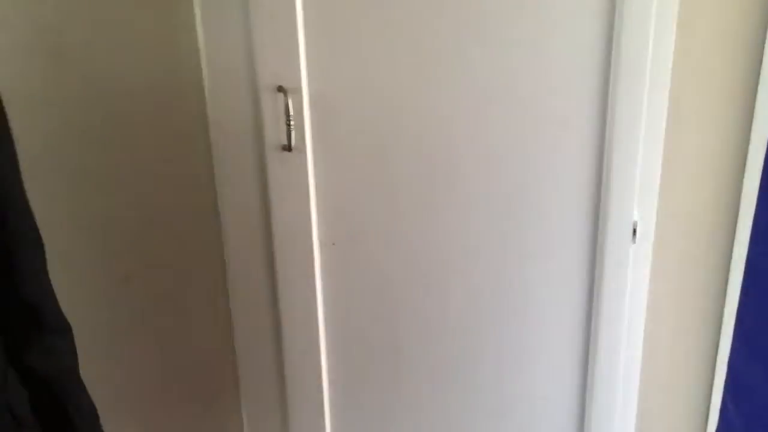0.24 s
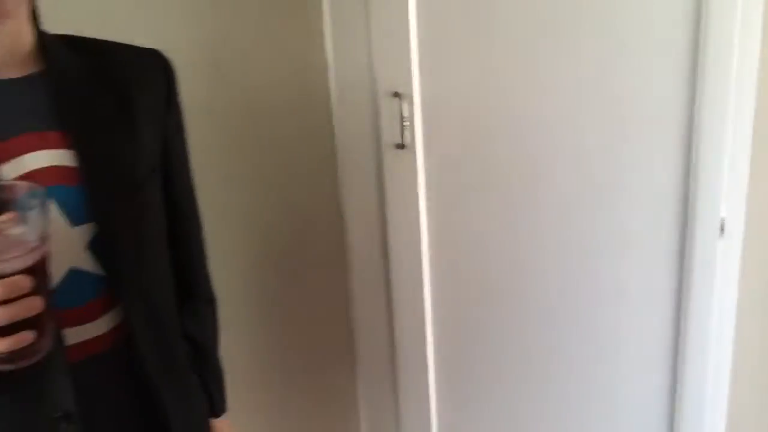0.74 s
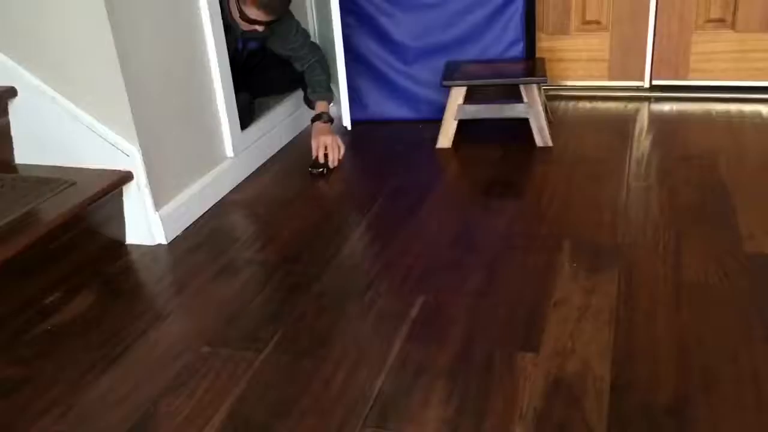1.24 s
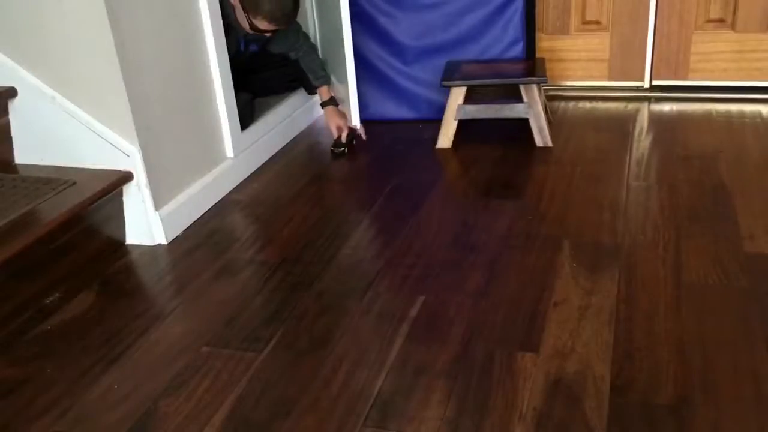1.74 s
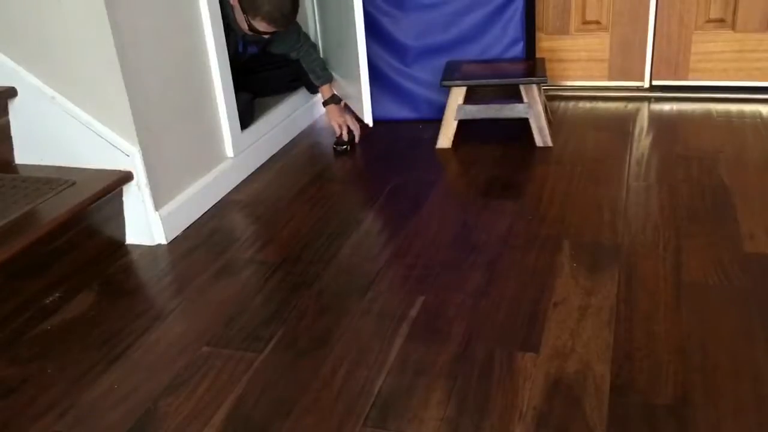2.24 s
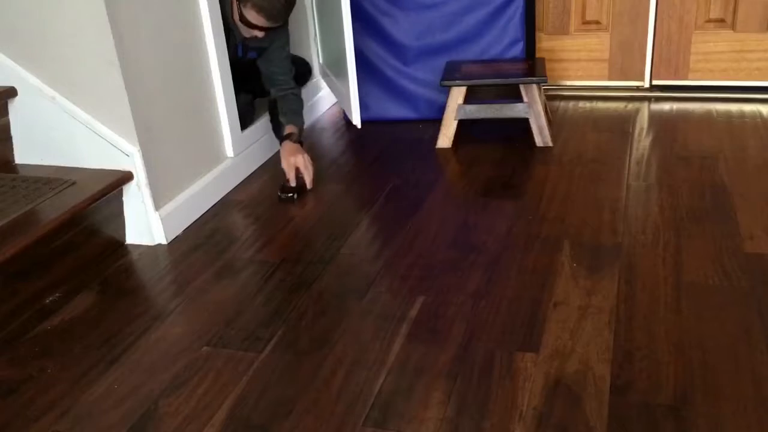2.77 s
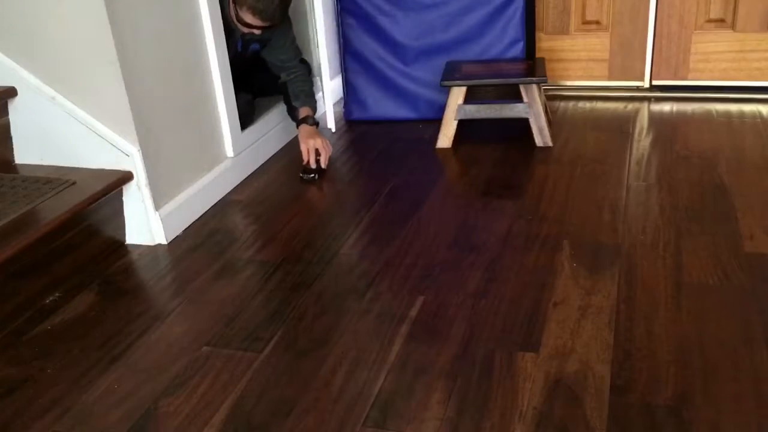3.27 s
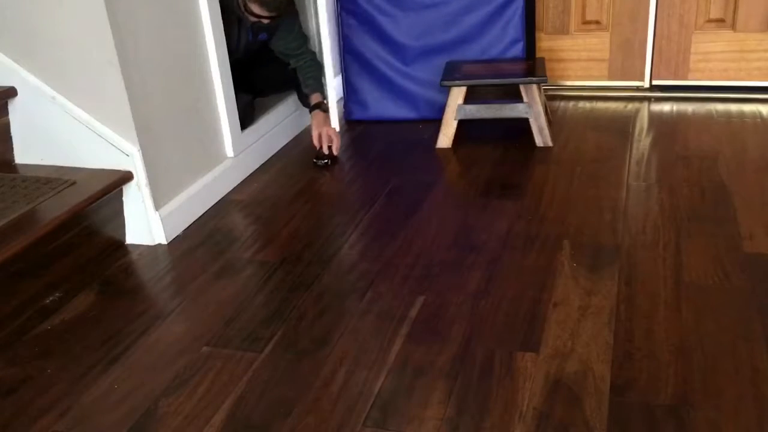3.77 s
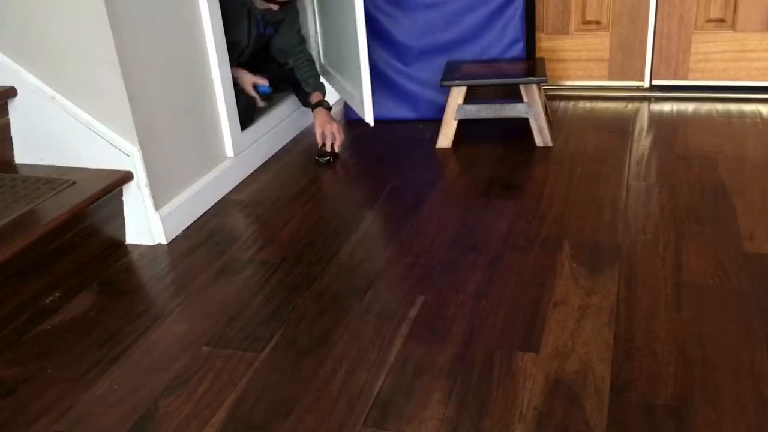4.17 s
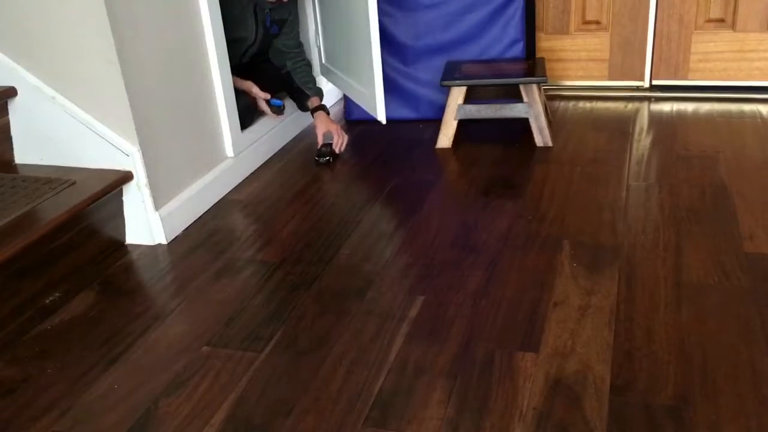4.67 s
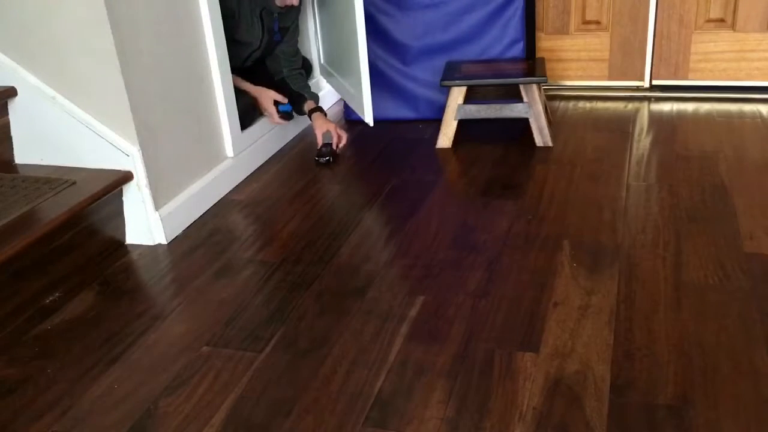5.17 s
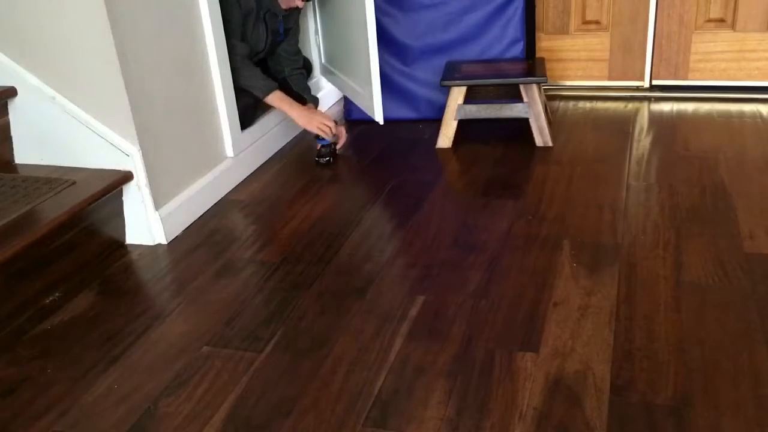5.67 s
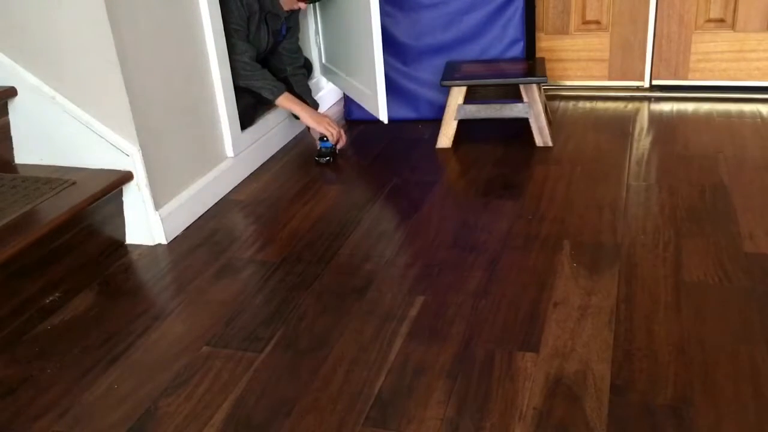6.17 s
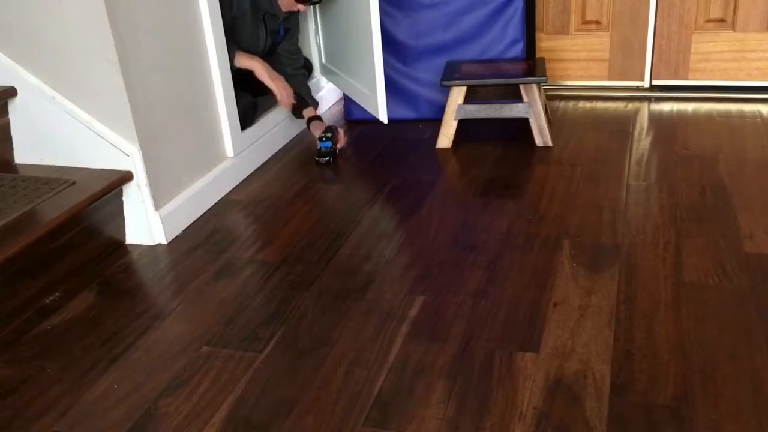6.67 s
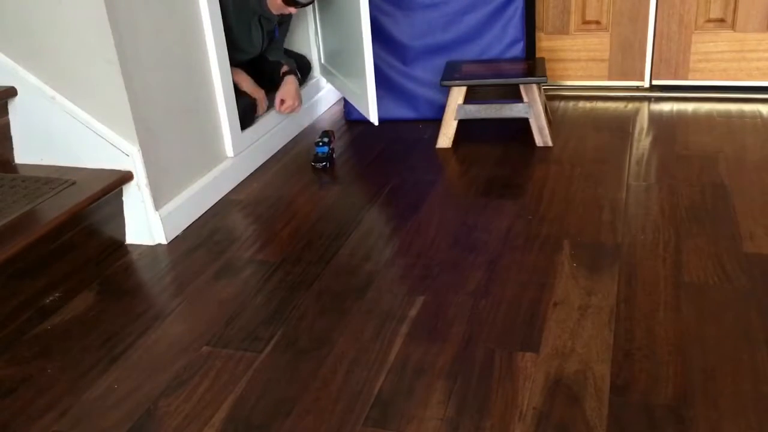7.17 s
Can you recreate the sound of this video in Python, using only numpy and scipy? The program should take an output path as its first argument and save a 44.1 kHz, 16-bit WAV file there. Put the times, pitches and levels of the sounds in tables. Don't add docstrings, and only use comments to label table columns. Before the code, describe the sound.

Indoors, in a small bare hallway with a wooden floor, over faint low house murmur and soft hiss. At about 0.15 s a door shuts with a deep, short thud and metallic latch click; soft boomy steps follow from 0.4 to 1.2 s. From 1.2 s a small toy car is handled very close: light plastic ticks, faint gear whirr while rolling, and four spaced sharp ratchet snaps between 1.7 and 2.0 s. Sparse ticks continue, then a hard wheel slap on the boards at 2.87 s. From 3.1 to 3.6 s the ratchet fires a fast, loud, bright burst of about thirteen snaps, with two more at 3.9 and 4.0 s. Soft clustered ticks come around 4.3 s, then isolated taps, a tiny flick at 5.28 s and light touches near 5.9 s. At 6.5 s a dull thump lands, followed by a close tick and low floor booms fading to the end.

```python
import sys
import numpy as np
from scipy import signal
from scipy.fft import rfft, irfft, next_fast_len
from scipy.io import wavfile

SR = 44100
rng = np.random.default_rng(int(sys.argv[2]) if len(sys.argv) > 2 else 0)


def inscribe(sig):
    pcm = np.round(np.clip(np.atleast_2d(sig).T, -1, 1) * 32767)
    wavfile.write(sys.argv[1], SR, pcm.astype(np.int16))


def amplitude_ratio(level_db):
    exponent = np.asarray(level_db, float) / 20
    return 10 ** exponent


N = 327001


def rms_one(x):
    return x / np.sqrt(np.mean(x ** 2) + 1e-20)


def drift(rate):
    r = np.exp(-2 * np.pi * rate / SR)
    walk = signal.lfilter([1], [1, -2 * r, r * r], rng.standard_normal(N + SR // 4))
    return rms_one(walk[SR // 4:])


def coloured(spectrum):
    size = next_fast_len(N)
    bins = rfft(rng.standard_normal(size))
    points_hz, points_db = np.transpose(spectrum)
    hz = np.arange(len(bins)) * SR / size
    level_db = np.interp(np.log(hz + 1), np.log(points_hz), points_db)
    return rms_one(irfft(bins * amplitude_ratio(level_db), size)[:N])


def swell(s, db, length, rise=0.79):
    out = np.zeros(N)
    near = np.arange(max(int((s - 4 * length) * SR), 0), min(int((s + 4 * length) * SR), N))
    u = (near / SR - s) / length
    out[near] = amplitude_ratio(db) * np.exp(-np.where(u < 0, u / rise, u) ** 2)
    return out


def body(x, peaks, lean_db=0):
    out = 0
    places = np.linspace(-1, 1, len(peaks))
    for k, ((hz, width, db), place) in enumerate(zip(peaks, places)):
        r = np.exp(-np.pi * width / SR)
        poles = [1, -2 * r * np.cos(2 * np.pi * hz / SR), r * r]
        ringing = signal.lfilter([1, 0, -1], poles, x + 1e-18) * (1 - r * r) / 2
        out = out + (-1) ** k * amplitude_ratio(db + place * lean_db) * ringing
    return out


def struck(at_s, peak_db, peaks, rise, fall, lean_db=0):
    t = np.arange(SR // 40) / SR
    shape = (1 - np.exp(-(t / rise) ** 2)) * np.exp(-t / fall)
    chatter = rng.standard_normal((len(at_s), len(t))) * shape
    hits = body(chatter, peaks, np.reshape(lean_db, (-1, 1)))
    out = np.zeros(N + len(t))
    for s, db, hit in zip(at_s, peak_db, hits):
        start = round(s * SR)
        out[start:start + len(t)] += amplitude_ratio(db) * hit / np.abs(hit).max()
    return out[:N]


def rung(at_s, peak_db, hz, rise, fall):
    t = np.arange(SR // 40) / SR
    out = np.zeros(N + len(t))
    shape = (1 - np.exp(-(t / rise) ** 2)) * np.exp(-t / fall)
    shape = shape / shape.max()
    for s, db, f in np.broadcast(at_s, peak_db, hz):
        start = round(s * SR)
        out[start:start + len(t)] += amplitude_ratio(db) * shape * np.sin(2 * np.pi * (f * t + rng.random()))
    return out[:N]


# (delay t/s, level/dB)
ECHOES = [
    (.0068, -11),
    (0.0103, -7.5),
    (.024, -12.5),
]


def hall(x, peaks, t60, wet_db, blur=1.9):
    out = x.copy()
    for s, db in ECHOES:
        out[round(s * SR):] += amplitude_ratio(db) * x[:-round(s * SR)]
    t = np.arange(SR * 3 // 4) / SR
    tail = rng.standard_normal(len(t)) * amplitude_ratio(-60 * t / t60) * (1 - np.exp(-t / 0.00033))
    own = signal.oaconvolve(x, tail / np.sqrt(np.sum(tail ** 2)))[:N]
    fill = np.exp(-1 / (0.00077 * SR))
    keep = amplitude_ratio(-2 * 60 / (t60 * SR))
    decay = np.convolve([1, -keep], [1, -fill])
    energy = signal.lfilter([(1 - keep) * (1 - fill)], decay, x ** 2 + 1e-18)
    wide = [(hz, blur * width, db) for hz, width, db in peaks]
    mixed = np.sqrt(np.abs(energy)) * rms_one(body(rng.standard_normal(N), wide))
    share = 0.45
    return out + amplitude_ratio(wet_db) * (np.sqrt(share) * own + np.sqrt(1 - share) * mixed)


# (t/s, level/dB)
STIRRING = [(0.0, -70), (0.2, -67.5), (0.37, -62.5), (0.6, -58.5), (0.9, -58.5), (1.05, -66), (2.04, -65),
            (2.64, -68.5), (3.51, -62), (4.6, -70), (5.34, -68.5), (6.48, -69.5), (6.73, -65.5),
            (7.41, -64)]
# (peak t/s, level/dB, length/s)
SCUFFS = [
    (0.174, -36.5, 0.048),
    (0.257, -51, 0.038),
    (2.904, -50.5, 0.068),
    (3.8, -45.5, 0.048),
    (6.858, -48, 0.019),
]
# (f/Hz, density/dB per Hz)
MURMUR = [(47, -57), (80, -10.5), (129, -7), (145, -13.5), (167, -13), (216, -12), (252, -26), (320, -26),
          (420, -56), (700, -120)]
RUSH = [(150, -36.5), (250, -1.5), (300, -5), (360, -8), (498, -9.5), (572, -11), (764, -14.5), (1300, -29),
        (1690, -69), (2860, -120)]
# (f/Hz, density/dB per Hz)
EARLY_HISS = [(530, -55), (900, -8), (1130, -12), (1460, -10), (2900, -15.5), (3560, -21), (4830, -21.5),
              (13900, -19.5), (15900, -7), (16500, -28)]
MAIN_HISS = [(530, -50), (900, 2.5), (1520, -3.5), (2440, -4.5), (2630, -9), (2930, -6.5), (4830, -10.5),
             (14100, -11.5), (15700, -12), (16500, -36.5)]
BRIGHT_HISS = [(530, -5), (900, -1.5), (1820, -2.5), (2240, -3.5), (3040, -3.5), (9310, -10), (10500, -15),
               (12200, -12.5), (15700, -22), (16500, -39)]
HISS_DB = [-69, -65, -54]
CHANGE_S = 1.2


def air(boom_level):
    t = np.arange(N) / SR
    stir_db = np.interp(t, *np.transpose(STIRRING))
    shaken = amplitude_ratio(-21) * boom_level + sum(swell(*row) for row in SCUFFS)
    rest = amplitude_ratio(-58 + 0.22 * (stir_db - stir_db.mean()))
    murmur = np.hypot(rest, shaken) * amplitude_ratio(1.5 * drift(21)) * coloured(MURMUR)
    rush = amplitude_ratio(stir_db + 1.5) * coloured(RUSH)
    bright_start_s, bright_end_s = 6.52, 7.28
    state = (t > CHANGE_S) * 1 + (t > bright_start_s) * (t < bright_end_s)
    spectra = [EARLY_HISS, MAIN_HISS, BRIGHT_HISS]
    hiss = np.choose(state, [amplitude_ratio(db) * coloured(c) for db, c in zip(HISS_DB, spectra)])
    build_db = (state == 2) * (-2.5 + 0.35 * (t - bright_start_s))
    hush = swell(6.44, -9, 0.11) * (state < 2)
    return murmur + rush + hiss * amplitude_ratio(build_db) * (1 - hush)


def whine():
    t = np.arange(N) / SR
    return amplitude_ratio(-79 + 3 * drift(24)) * np.sin(2 * np.pi * 15800 * t) * (t < CHANGE_S)


# (peak t/s, level/dB, f/Hz, length/s)
FLOOR_BOOMS = [
    (.03, -55.5, 50.6, 0.083),
    (.27, -36, 50.1, 0.09),
    (.42, -44, 50.4, 0.042),
    (.51, -42.5, 55.1, 0.044),
    (.62, -41.5, 58, 0.1),
    (.72, -43.5, 62.6, 0.1),
    (.87, -42.5, 50.9, 0.1),
    (1.0, -40.5, 60, 0.094),
    (1.13, -44.5, 62, 0.094),
    (1.24, -42.5, 56, 0.057),
               (1.54, -47.5, 60.1, 0.044), (1.636, -44.5, 52.1, 0.028), (2.202, -56, 63, 0.073),
                (2.55, -57, 64.2, 0.11), (2.917, -61, 69, 0.093), (3.17, -55, 60, 0.068),
                (3.683, -49.5, 52, 0.053), (3.865, -39, 68.9, 0.014), (4.273, -44.5, 60.3, 0.067),
                (4.698, -53, 58, 0.035), (5.257, -34, 61, 0.061), (5.356, -45, 40, 0.069),
                (5.772, -50, 51.7, 0.037), (5.828, -46.5, 55, 0.051), (5.995, -55, 37.9, 0.046),
                (6.11, -59, 58, 0.085), (6.431, -41.5, 68, 0.045), (6.494, -40, 56.1, 0.017),
                (6.648, -31, 55.1, 0.065), (6.73, -31.5, 35.9, 0.098), (6.887, -33, 47.85, 0.12),
                (7.08, -42, 45, 0.1), (7.325, -42.5, 42, 0.078), (7.41, -37.5, 35.3, 0.027)]


def boom():
    clock = np.cumsum(1 + .03 * drift(9)) / SR
    loose = coloured([(12, -35.0), (30, 8.0), (45, 6.0), (75, 10.0), (105, -5.5), (140, -44.5)])
    modes, power = 0, 0
    for s, db, hz, length in FLOOR_BOOMS:
        push = swell(s, db, length)
        modes = modes + push * np.sqrt(2) * np.sin(2 * np.pi * (hz * clock + rng.random()))
        power = power + push ** 2
    level = np.sqrt(power)
    rest = amplitude_ratio(-60 + 4.1 * drift(3.8))
    return modes + (0.42 * level + rest) * loose, level


def slam():
    t = np.maximum(np.arange(N) / SR - 0.15, 0)
    shape = (1 - np.exp(-t / 0.0084)) * np.exp(-(t / 0.065) ** 3.0)
    return -amplitude_ratio(-14.5) * np.sin(2 * np.pi * 58 * t) * shape


# (t/s, peak level/dB)
LATCH = [
    (0.1244, -39),
    (0.1473, -26.5),
    (0.151, -42),
    (0.1603, -34.5),
]
# (f/Hz, width/Hz, level/dB)
LATCH_MODES = [(1020, 480, 0), (1700, 320, 5), (2840, 1700, -1.5), (4540, 340, 4), (5670, 1100, 0.5),
               (9400, 2900, -5), (14100, 1900, 1.5)]


def latch():
    return hall(struck(*np.transpose(LATCH), LATCH_MODES, rise=0.00029, fall=0.0023), LATCH_MODES,
                t60=0.3, wet_db=-1.0)


def thud():
    at_s = 6.5163
    t = np.maximum(np.arange(N) / SR - at_s, 0)
    turns = 3.8 * np.log(np.maximum(t, 1e-4) / .0004) + 2 * np.pi * 18 * t
    shape = (t > .00025) * (0.52 + 40 * t) * np.exp(-(t / 0.033) ** 1.4)
    crack_modes = [(1200, 1500, -2), (3000, 2500, -1), (6000, 3700, -9), (11000, 5000, -21)]
    crack = struck([at_s], [-35], crack_modes, rise=.0002, fall=.0008)
    return crack - amplitude_ratio(-27) * np.cos(turns) * shape


# (t/s, peak level/dB, f/Hz, t60/s)
KNOCKS = [
    (.147, -33, 563, 0.021),
    (0.683, -50.5, 3500, 0.027),
    (1.227, -40, 1700, 0.069),
    (2.739, -37, 674, 0.021),
    (2.874, -44, 660, 0.041),
    (3.095, -26.5, 615, 0.0075),
    (3.785, -30.5, 163.6, 0.11),
    (5.277, -48, 1000, 0.035),
    (7.39, -65, 663, 0.046),
]


def knocks():
    t = np.arange(SR // 5) / SR
    out = np.zeros(N + len(t))
    for s, db, hz, t60 in KNOCKS:
        pair = np.sin(2 * np.pi * hz * t) + 0.365 * np.sin(2 * np.pi * 1.21 * hz * t)
        start = round(s * SR)
        out[start:start + len(t)] += amplitude_ratio(db - 3.5 - 60 * t / t60) * pair * (1 - np.exp(-t * hz * 3.4))
    return out[:N]


# (t/s, peak level/dB)
CLOSE_TICKS = [
    (6.577, -50),
    (6.5976, -35),
]


def close_ticks():
    return struck(*np.transpose(CLOSE_TICKS), SPRING[:3], rise=.0003, fall=0.0012)


# (t/s, peak level/dB)
FLICK = [
    (5.2705, -53),
    (5.2773, -36.5),
    (5.288, -57),
]
# (f/Hz, width/Hz, level/dB)
FLICK_MODES = [(3500, 2800, -6), (6160, 1400, -1), (8000, 1500, -1.5), (10400, 1500, -4), (12800, 1900, 1),
               (14800, 1500, -2)]


def flick():
    return hall(struck(*np.transpose(FLICK), FLICK_MODES, rise=0.00038, fall=0.0036), FLICK_MODES,
                t60=0.35, wet_db=-2.0)


# (t/s, peak level/dB)
CLACK = [
    (2.8723, -14.5),
    (2.882, -22),
]
# (f/Hz, width/Hz, level/dB)
CLACK_MODES = [(1000, 1100, -17), (1790, 200, -2.5), (2300, 450, -3.5), (3050, 300, -0.5),
               (3920, 360, -7.5), (5350, 300, -4), (5920, 550, -3.5), (6560, 900, -5.5), (10960, 780, -6),
               (11500, 700, -6.5)]
CLACK_TOP = [(7500, 1200, -4.5), (8420, 1500, -4), (9500, 830, -3), (12400, 1200, -3), (13500, 1200, -3),
             (14850, 1500, -4)]
# (f/Hz, level/dB)
CLACK_RINGS = [(1620, -28), (2500, -27.5), (3110, -25.5), (3950, -27), (5330, -23), (5750, -24),
               (6200, -22.5), (8300, -27.5), (9200, -27.5), (10950, -20.5)]


def clack():
    s, db = np.transpose(CLACK)
    chatter = struck(s, db, CLACK_MODES, rise=0.00055, fall=0.0042)
    hiss = struck(s, db - 4.5, CLACK_TOP, rise=0.00075, fall=0.0043)
    rings = sum(rung(s[0], ring_db, hz, rise=0.00091, fall=0.0053) for hz, ring_db in CLACK_RINGS)
    beamed = 0.45
    slap = hall(chatter + (1 - beamed) * rings, CLACK_MODES, t60=0.52, wet_db=1.0)
    return slap + beamed * rings + hall(hiss, CLACK_TOP, t60=0.33, wet_db=0.5)


# (peak t/s, level/dB, length/s)
SCRAPES = [
    (1.25, -65, .04),
    (1.45, -66, .13),
    (2.1, -68, .2),
    (2.757, -53, .012),
    (3.525, -56, .02),
    (4.33, -70, .06),
]
# (f/Hz, width/Hz, level/dB)
BOARDS = [(655, 210, -5.5), (795, 230, -1.5), (1163, 450, -6)]


def boards():
    s, strength_db = np.array(SNAPS)[:, :2].T
    answer = struck(s, strength_db + np.array(TEETH)[:, 4], BOARDS, rise=0.00037, fall=0.0053)
    scrape = sum(swell(*row, rise=0.53) for row in SCRAPES) * amplitude_ratio(7.5 * drift(150))
    rasp = scrape * rms_one(body(rng.standard_normal(N), BOARDS))
    return hall(answer + rasp, BOARDS, t60=0.4, wet_db=-2.0)


# (start t/s, length/s, level/dB)
ROLLS = [
    (1.277, 0.069, -45),
    (1.456, 0.42, -49.5),
    (2.35, 0.055, -49.5),
    (2.766, 0.089, -56.5),
    (3.66, 0.22, -44.5),
    (4.269, 0.13, -50),
    (5.499, 0.28, -58.5),
    (5.9, 0.16, -66),
]


def rolls():
    t = np.arange(N) / SR
    out = 0
    for s, length, db in ROLLS:
        sag_db = 26 * np.clip(t - s, 0, length)
        stop_db = 297.5 * np.clip(t - s - length, 0, 1)
        out = out + amplitude_ratio(db - sag_db - stop_db) * np.clip((t - s) / 0.015, 0, 1)
    return out


def light_levels(rows, gear_db):
    _, shell, running, spring = np.transpose(rows)
    return [shell, shell + running, shell + running + gear_db, shell + spring]


# (f/Hz, width/Hz, level/dB)
TOUCHED = [
    [(1600, 600, -3.5), (2140, 280, 3), (2684, 450, -4)],
    [(2860, 390, -7.5), (3864, 340, -2.5)],
    [(5390, 430, -2.5), (6495, 1000, -9), (9300, 570, -7.5)],
    [(10900, 450, -2.5), (13500, 3500, 1), (16500, 1200, -7)],
]
# (chatter under a slip/dB offset, in the second column; clear ring under a slip/dB, in the first;
# clear mode under a light touch f/Hz, its ring level/dB, its chatter level/dB)
CLEAR = [
    (-3, -3.5, 2072, -3, -4.5),
    (-3, -4.5, 3780, -2.5, -4),
    (-5.5, -1.5, 5350, -10.5, -1.5),
    (-5.5, -2, 7600, -16, -1.5),
]
# (t/s, shell level/dB, running gear rel/dB, spring rel/dB)
TICKS = [(1.223, -46.5, -2.5, -21), (1.2865, -43, -4.5, -10), (1.3531, -35.5, -3, -4.5),
         (1.375, -33, -3, -5.5), (1.4513, -37.5, -0.5, -3), (1.491, -37.5, -3.5, -9.5),
         (1.5184, -48.5, 1.5, 5), (1.755, -34, -5, -1), (2.142, -34.5, -9, 1), (2.266, -45.5, -12, -6),
         (2.3363, -43, -10.5, -9), (2.376, -38.5, -3.5, -5), (2.4043, -40, -4.5, -17),
         (2.5624, -43.5, -24.5, -15.5), (2.6926, -45.5, -14.5, -27.5), (2.7377, -47, -15.5, -18),
         (2.7539, -51, 0, -1.5), (2.782, -46, -13.5, -9), (3.092, -45, 0.5, 0.1), (3.732, -38.5, -5.5, -12),
         (3.818, -54.5, 5.5, 17.5), (3.838, -40, -5, 0.5), (4.2823, -39, -8, -8), (4.3016, -52, 4, -4),
         (4.3215, -36.5, -1.5, -1), (4.345, -44, -5, -17), (4.358, -44, 0, -12), (4.37, -47, -9, -15),
         (4.3959, -44, 1.5, -10.5), (4.409, -47, -3.5, -12), (4.423, -52, -13, -18),
         (4.4761, -39.5, -2.5, -20)]
TICK_SHELL_HZ = [1750, 2000, 2000, 2050, 2250, 2600, 2600, 2100, 1900, 2200, 2150, 2100, 2150, 2000, 2000,
                 2000, 2100, 2100, 2100, 2100, 2100, 2100, 2000, 2300, 2050, 2000, 2200, 2500, 2100, 2600,
                 2000, 2000]
TICK_GEAR_DB = [-3, -0.5, 0, -3, -0.5, -2.5, -1.5, 1.5, 3, 1, -5, -1.5, -3, 0, 0, -0.5, -0.5, -1, 0, 0, 0,
                -0.5, -6, -2, -2, -5, -5, -6, -3, -1, -3, -4]


def handling_ticks(k, slow):
    _, _, hz, ring_db, chatter_db = CLEAR[k]
    at = np.array(TICKS)[:, 0] - .0006
    db = light_levels(TICKS, TICK_GEAR_DB)[k]
    ring_hz = hz * rng.normal(1, 0.035, len(at)) if k else TICK_SHELL_HZ
    chatter = struck(at, db + 5.5 + chatter_db, TOUCHED[k], 0.0013 * slow, 0.0034 * slow)
    return chatter + rung(at, db + 3.5 + ring_db, ring_hz, .0008, 0.0023)


# (t/s, shell level/dB, running gear rel/dB, spring rel/dB)
TOUCHES = [(4.7038, -39, -3, -10), (4.927, -39.5, -2.5, -5), (5.162, -55.5, -10, -20),
           (5.528, -40, -2, -2.5), (5.59, -46, 1.5, 3), (5.887, -40.5, -5, -8), (5.9335, -43, -5.5, -4),
           (5.942, -42.5, -10, -13), (5.953, -47, -9, -14), (5.987, -51, -6, -5), (6.2792, -45, -12.5, -10),
           (6.8335, -41, -8.5, -5)]
TOUCH_SHELL_HZ = [2100, 2040, 2290, 2000, 2600, 2100, 2300, 2300, 2770, 2100, 2300, 2020]
TOUCH_GEAR_DB = [-1, -0.5, -4.5, -2, -4, 1, -2.5, 2, 0, 0, 0.5, -0.5]


def resting_touches(k, slow):
    _, _, hz, ring_db, chatter_db = CLEAR[k]
    at = np.array(TOUCHES)[:, 0] - .0006
    db = light_levels(TOUCHES, TOUCH_GEAR_DB)[k]
    tap = struck(at, db + 8.0 + chatter_db, TOUCHED[k], 0.00031 * slow, 0.0034 * slow)
    return tap, rung(at, db + 6.0 + ring_db, hz if k else TOUCH_SHELL_HZ, 0.0007, 0.0022)


# (t/s, strength level/dB, shell rel/dB, axle rel/dB, spring rel/dB)
SNAPS = [(1.731, -11.5, -6, -4.5, 1.5), (1.7858, -12.5, -11.5, -7, 0), (1.8623, -15.5, 1, -6.5, 7),
         (1.979, -15.5, -5.5, -8.5, 2.5), (3.0949, -12.5, -9.5, -5, 3.5), (3.1607, -14.5, -5, -2, 9),
         (3.2042, -12, -7, -5, 2), (3.24, -9, -14, -8.5, -4.5), (3.2829, -12, -3.5, -6.5, -2),
         (3.329, -12, -7, -5, -2.3), (3.362, -13, -2, -2.5, 1), (3.3977, -14, -6, -6.5, -1.2),
         (3.4254, -14.5, -6.5, 0, 3.5), (3.461, -11.5, -4, -8, 1), (3.4983, -11, -8, -7, -2),
         (3.529, -10, -9.5, -9, -1.5), (3.5821, -12.5, -6, -4.5, 0.5), (3.879, -8.5, -7.5, -13.5, -2.5),
         (4.002, -12.5, -2.5, -4, 1)]
# (shell f/Hz, axle f/Hz, gear f/Hz, gear rel/dB, boards rel/dB)
TEETH = [(2315, 3750, 8900, -2.5, -30.5), (2220, 3800, 8000, -2.5, -32.5), (2136, 3650, 7300, -2.5, -24.5),
         (2445, 3630, 6400, -0.5, -23), (2300, 3700, 9400, -3, -29), (1900, 3700, 7000, -2.5, -31.5),
         (1990, 4200, 6600, -3.5, -30.5), (2200, 4400, 7600, -3, -36), (1900, 3770, 12000, -2.5, -34),
         (1850, 3400, 11000, -3, -32), (2200, 5600, 8300, -3.5, -28), (2200, 4300, 6900, -4.5, -28.5),
         (2200, 3700, 12000, -3.5, -31.5), (1900, 3800, 7000, -1.5, -33.5), (2400, 3980, 4200, -1.5, -32.5),
         (2400, 3500, 4600, -3.5, -25.5), (1936, 4100, 7200, -3, -35), (2280, 3100, 7000, -4, -39.5),
         (2360, 2840, 8100, -3.5, -33)]
SPRING_RING_HZ = [15200, 15250, 15050, 15200, 14100, 14370, 14600, 15300, 14800, 14460, 15200, 13800, 14500,
                  13520, 14100, 11500, 15200, 14700, 11460]
# (shell/dB, axle/dB, gear/dB, spring/dB)
LEANS = [(1, -7.5, 1.5, 0), (-9, -4.5, -0.5, -4.5), (2.5, 1, 1.5, 2.5), (3, 2, 0.5, -3), (1.5, -2, 2, 0),
         (0.5, -2, -1, -1.5), (1.5, -1.5, 1, 1.5), (-0.5, -3, 3, -3), (-2, 0.5, 1.5, 3),
         (-2.5, -0.5, 0.5, -1), (0.5, -2, 2, -0.5), (-0.5, 2.5, 0.5, -1.5), (-0.5, -1.5, 1, -1.5),
         (1.5, -0.5, 1.5, -1), (-2, 1.5, 1.5, -1), (0, -3.5, 2, -3.5), (8.5, -2.5, 2, -2.5),
         (2, 3, -0.5, -3.5), (2, -2.5, -2.5, -3)]
RING_S = [0.0016, 0.0021, 0.0014, 0.0006]


def slips(k, peaks, slow):
    s, strength, shell, axle, spring = np.transpose(SNAPS)
    shell_hz, axle_hz, gear_hz, gear, _ = np.transpose(TEETH)
    ring_db, chatter_db = CLEAR[k][:2]
    at = s - .0006
    db = strength + [shell, axle, gear, spring][k] + 4
    lean_db = np.array(LEANS)[:, k]
    rested = np.diff(s, prepend=0) > .06
    first = struck(at[rested], db[rested] + chatter_db, peaks, 0.0004 * slow, 0.0018 * slow,
                   lean_db[rested])
    running = struck(at[~rested], db[~rested] + chatter_db, peaks, 0.00063 * slow, 0.0021 * slow,
                     lean_db[~rested])
    ring_hz = [shell_hz, axle_hz, gear_hz, SPRING_RING_HZ][k]
    return first, running, rung(at, db + ring_db, ring_hz, .0006 * slow, RING_S[k])


# (f/Hz, width/Hz, level/dB)
SHELL = [(1000, 330, -13.5), (1728, 315, -5), (1954, 240, -1), (2300, 302, -1.5), (2643, 304, -4.5)]
AXLE = [(3500, 820, 1), (3760, 360, 5.5), (4500, 290, -8)]
GEAR = [(5860, 970, -3.5), (6460, 480, -1), (7080, 440, -3), (8380, 730, -4.5), (9500, 860, -5)]
SPRING = [(11570, 900, -1), (13300, 810, 1.5), (14070, 900, 5), (15600, 1000, 5)]
# (f/Hz, width/Hz, level/dB)
SPRING_IN_HALL = [(11400, 600, 2.5), (13200, 700, 1.5), (13900, 600, 2.5), (15200, 700, -1.5)]
# (contact slowness as a factor, whirr level/dB, hall t60/s, hall level/dB)
PARTS = [
    (1.16, -6, 0.61, -2),
    (1.25, -10.5, 0.69, -1),
    (1.29, -15, 0.61, -1.5),
    (0.8, -20.5, 0.39, -3),
]
BEAMED = [0.57, 0.5, 0.6, 0.64]


def car():
    contact_level = amplitude_ratio(2.2 * rng.exponential(1, N).clip(0, 4))
    teeth = (rng.random(N) < 1500 / SR) * contact_level * rng.choice([-1, 1], N)
    rolling = rolls()
    tick_hall_db, touch_hall_db = [-0.5, -0.5, -0.5, 1.5], [-0.63, -0.65, -1.1, -0.5]
    first_direct, running_direct = [0.28, 0.18, 0.25, 0.6], [0.064, 0.073, 0.12, 0.4]
    hall_peaks = [SHELL, AXLE, GEAR, SPRING_IN_HALL]
    out = 0
    for k, peaks in enumerate([SHELL, AXLE, GEAR, SPRING]):
        slow, whirr_db, t60, wet_db = PARTS[k]
        light, beamed = TOUCHED[k], BEAMED[k]
        first, running, clear = slips(k, peaks, slow)
        soft = handling_ticks(k, slow)
        tap, knock = resting_touches(k, slow)
        whirr = rolling * amplitude_ratio(whirr_db) * rms_one(body(teeth, peaks))
        out = out + hall(first + running + (1 - beamed) * clear + whirr, hall_peaks[k], t60, wet_db)
        out = out + hall(soft, light, t60, wet_db + tick_hall_db[k], blur=2)
        out = out + hall(tap + (1 - beamed) * knock, light, 0.73 * t60, wet_db + touch_hall_db[k], blur=1.6)
        out = out + beamed * (clear + knock) + first_direct[k] * first + running_direct[k] * running
    s, strength, _, _, spring = np.transpose(SNAPS)
    crack_db = strength + spring + 4 - 6.5
    out = out + struck(s, crack_db, SPRING, rise=0.00016, fall=0.0003)
    return signal.sosfilt(signal.butter(6, 1450, "high", fs=SR, output="sos"), out)


def scene():
    low, low_level = boom()
    background = air(low_level) + whine() + low
    blows = slam() + latch() + thud() + knocks()
    near = close_ticks() + flick() + clack() + boards() + car()
    return (background + blows + near)[None]


def roll_off(x):
    return signal.sosfilt(signal.butter(12, 17000, fs=SR, output="sos"), x)


def record(dry):
    cutoff_hz, leak_hz = 15950, 17000
    cut = signal.sosfilt(signal.cheby2(24, 60, cutoff_hz, fs=SR, output="sos"), dry)
    tips = dry - np.clip(dry, -.3, .3)
    band = signal.cheby2(8, 50, [cutoff_hz - 300, leak_hz], "band", fs=SR, output="sos")
    leak = signal.sosfilt(band, tips)
    return roll_off(np.clip(cut + amplitude_ratio(-6.5) * leak, -1, 1))


dry = scene()
out = record(dry)
inscribe(out)
```